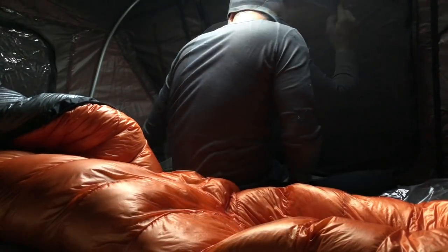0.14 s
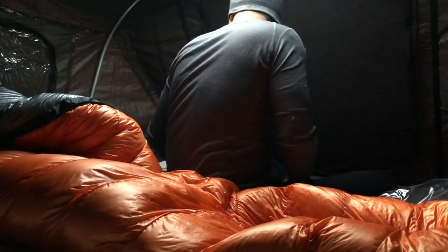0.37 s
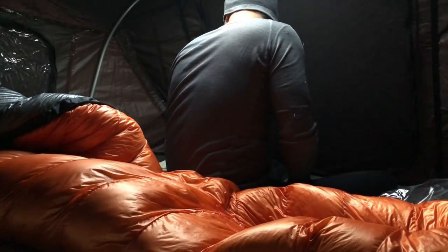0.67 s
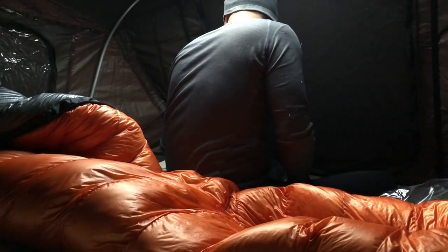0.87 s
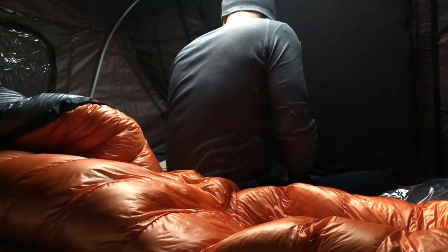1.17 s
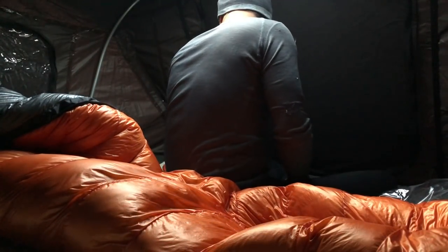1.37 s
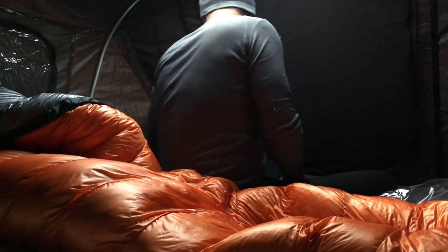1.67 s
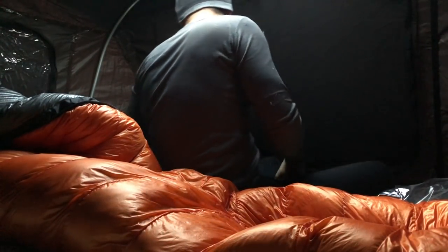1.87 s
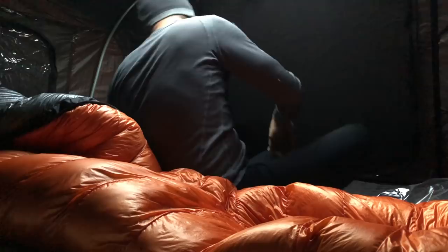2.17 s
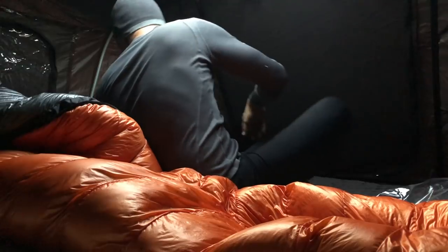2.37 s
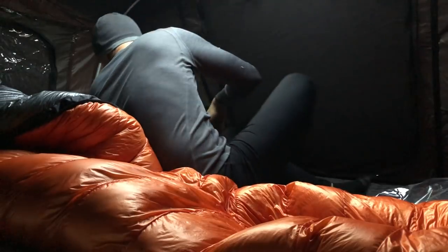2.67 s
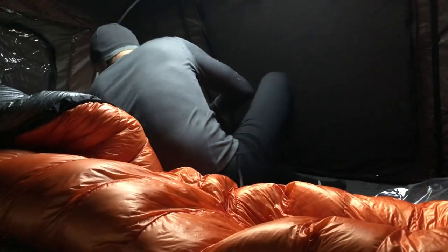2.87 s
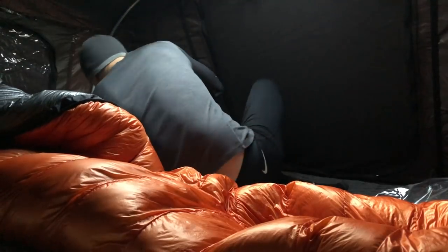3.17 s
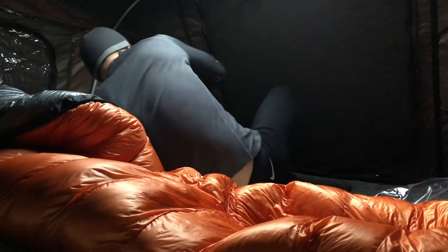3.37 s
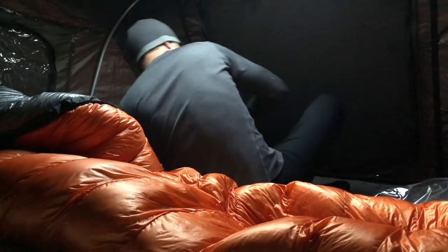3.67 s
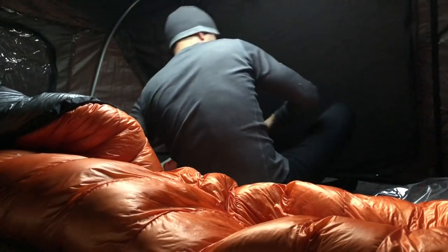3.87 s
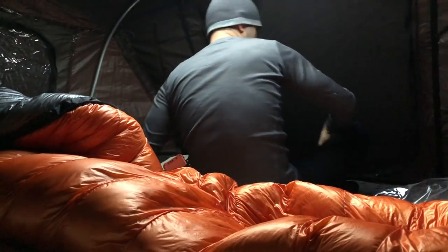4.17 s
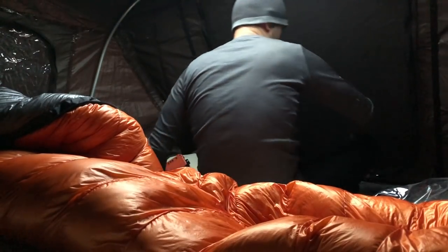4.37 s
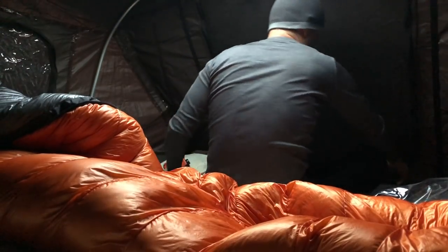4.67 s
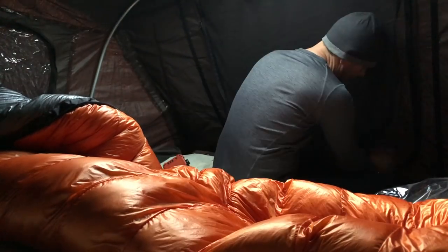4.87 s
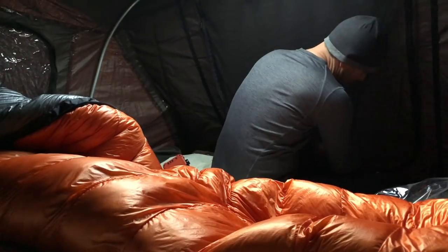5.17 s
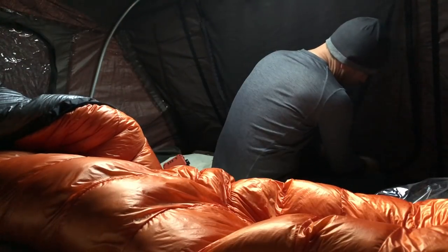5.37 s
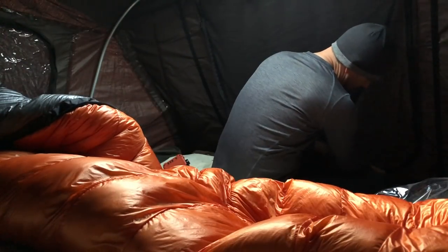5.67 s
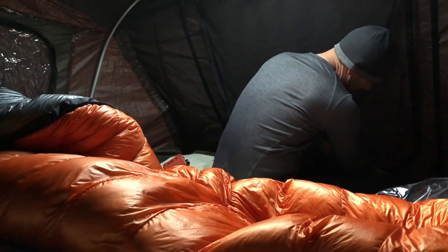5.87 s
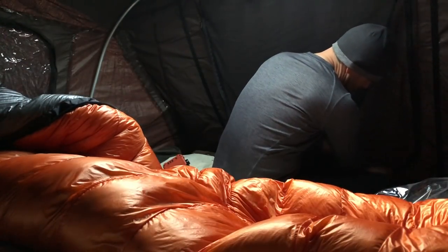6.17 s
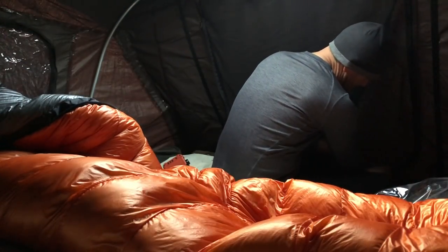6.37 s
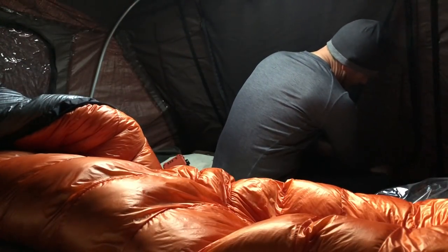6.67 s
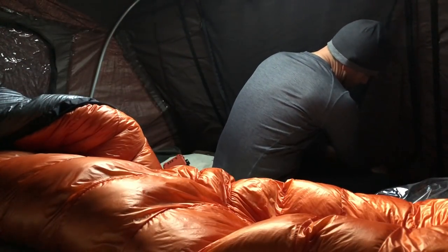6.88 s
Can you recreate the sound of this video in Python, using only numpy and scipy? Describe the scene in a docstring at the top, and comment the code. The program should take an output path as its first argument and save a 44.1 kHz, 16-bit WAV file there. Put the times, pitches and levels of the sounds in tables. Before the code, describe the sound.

In a small, nearly echo-free fabric tent, a low, gently uneven outdoor rumble runs throughout. From 0 to 0.35 s a zip is jerked in very short bursts, its teeth fusing into a buzzy whine, with cloth swishes, sharp clicks and soft low thumps. Sleeve brushes continue, and a weaker zip stroke rises in pitch at 0.8-0.9 s. Light rustles fade by 1.6 s. From 1.8 s a man turns on nylon bedding: swishing builds, strongest around 2.4-3.6 s, with dull weight thuds and short rasping drags at 3.1-3.7 s. It eases near 4 s, then softly resumes from 4.3 s. Crisp, airy brushes run from 4.8 to 5.4 s. A click and thump land at 5.75 s. From 6.1 to 7 s, metal pulls tick, knock and jingle in quick fumbling clusters, brightest near 6.45 and 6.86 s, over small padded bumps.

```python
"""Inside a small fabric tent a man runs a zip in two quick strokes: teeth tick so fast that they whine.
He then shifts about on nylon bedding, where filtered noise with tiny snaps makes the cloth swish and rasp.
His weight thumps the padded floor as short, low swings.
At last he fumbles with metal zip pulls, which click as noise bursts and jingle as fading sines.
A low outdoor rumble of shaped noise comes through the walls all along."""
import sys
import numpy as np
from scipy import signal
from scipy.fft import rfft, irfft
from scipy.io import wavfile
from scipy.ndimage import uniform_filter1d

SR = 44100
rng = np.random.default_rng(int(sys.argv[2]) if len(sys.argv) > 2 else 0)


def to_wav(sig):
    """Store sig (one row per channel, or 1-D mono) as 16-bit WAV at the path in sys.argv[1].

    Samples outside -1..1 are clipped; the rate is SR.
    """
    pcm = np.clip(np.atleast_2d(sig), -1, 1) * 32767
    pcm = np.round(pcm).astype(np.int16)
    wavfile.write(sys.argv[1], SR, pcm.T)  # frames by channels


N = 310464
T = np.arange(N) / SR
EDGE_HZ = 15900  # upper edge of the sound

# hiss of sliding nylon, also the plain tick of a contact: (frequency [Hz], density [dB per Hz])
SWISH_SPECTRUM = [(400, -29), (1500, -4), (2900, -0.5), (4000, 2), (6500, -0.5), (8500, -2.5), (11000, -6),
                  (16000, -9)]
# airy top of a light touch, also the bright part of a contact: (frequency [Hz], density [dB per Hz])
SHEEN_SPECTRUM = [(2000, -47), (6500, -5), (9000, -6.5), (12000, -4), (16000, -3.5)]


def amp(db):
    """Turns decibels into gain."""
    return 10 ** (np.asarray(db) / 20)


def unit(x):
    """Scales to an rms of 1."""
    return x / np.sqrt(np.mean(x ** 2) + 1e-20)


def add(mix, s, sound):
    """Mixes a sound in at a time in seconds."""
    part = mix[max(round(s * SR), 0):][:len(sound)]
    part += sound[:len(part)]


def curves(rows):
    """Joins the rows of a table by straight lines over time, one curve a column."""
    s, *columns = np.transpose(sorted(map(tuple, rows)))
    return [np.interp(T, s, c) for c in columns]


def colour(x, spectrum):
    """Filters a signal by a spectrum, at an rms of 1."""
    hz, db = np.transpose(spectrum)
    f = np.fft.rfftfreq(len(x), 1 / SR)
    gain = amp(np.interp(np.log(f + 1), np.log(hz), db))
    return unit(irfft(rfft(x) * gain, len(x)))


def noise(spectrum):
    """Steady noise of a given spectrum, at an rms of 1."""
    return colour(rng.standard_normal(N), spectrum)


def wander(hz):
    """Slow random drift of rms 1, dying away above hz."""
    f = np.fft.rfftfreq(N, 1 / SR)
    return unit(irfft(rfft(rng.standard_normal(N)) / (1 + (f / hz) ** 4), N))


def resonate(x, hz, width):
    """A resonance of gain 1 whose pitch may follow a curve."""
    turn = np.exp(2j * np.pi * np.cumsum(hz * np.ones(len(x))) / SR)
    r = np.exp(-np.pi * width / SR)
    # shift the pitch down to zero, smooth, and shift it back up
    smooth = signal.lfilter([1 - r], [1, -r], x / turn + 1e-18)
    return 2 * (turn * smooth).real


def resonate_twice(x, hz, width):
    """Two resonances in a row, the second twice as wide, for steeper sides."""
    return resonate(resonate(x, hz, width), hz, 2 * width)


def body(x, modes):
    """What a body with these resonances makes of a drive."""
    return sum(amp(db) * resonate_twice(x, hz, width) for hz, width, db in modes)


def stroke(length, from_hz, to_hz, grip_s, stop_s):
    """A pull grips, holds and stops while its pitch glides evenly: (envelope, Hz)."""
    t = np.arange(0, length, 1 / SR)
    envelope = np.clip(np.minimum(t / grip_s, (length - t) / stop_s), 0, 1)
    return envelope, from_hz + (to_hz - from_hz) * t / length


def zipper(jitter=0.021, flutter_db=2.0, direct_db=-23, scrape_from=0.77):
    """The slider snaps one tooth after another; at speed the ticks fuse into a whine."""
    # resonances of zip tape and taut door panel: (frequency [Hz], first-pass width [Hz], level [dB])
    panel_modes = [(600, 190, 8), (918, 210, -1), (1336, 120, -11), (1770, 620, -2), (2450, 110, -18),
                   (2590, 220, -8), (3200, 320, -14), (6100, 670, -21)]
    # the slider sticks and runs, one row a run: (start [s], length [s], teeth at the start [per s],
    # teeth at the end [per s], level [dB], roughness [0-1])
    runs = [(.002, 0.029, 1400, 1800, -51, 0.45), (0.024, 0.043, 2004, 2040, -34.5, 0.2),
            (0.058, .036, 2150, 2460, -47.5, 0.3), (0.121, .018, 2600, 2830, -41, 0),
            (.16, 0.044, 2600, 2410, -51, 0.33), (0.245, .095, 1600, 1340, -53, .85),
            (0.797, .065, 585, 942, -43, 0.26), (0.867, 0.032, 1340, 1395, -49, 0.24)]
    grip_s, stop_s = 0.0058, 0.0068
    speed_db_per_octave = 9  # a run is louder the faster it goes
    out = np.zeros(N)
    unsteady, flutter = 1 + jitter * wander(300), flutter_db * wander(160)
    for s, length, from_hz, to_hz, db, rough in runs:
        envelope, hz = stroke(length, from_hz, to_hz, grip_s, stop_s)
        now = round(s * SR) + np.arange(len(hz))
        rate = hz * unsteady[now]
        turns = np.cumsum(rate) / SR
        ticks = sum(np.cos(2 * np.pi * k * turns) * (k * rate < EDGE_HZ) / np.sqrt(k)
                    for k in range(1, 13))
        # rough runs scrape: noise that swells once a tooth
        scrape = (1 + np.cos(2 * np.pi * turns)) * rng.standard_normal(N)[now]
        cutoff_hz = min(scrape_from * hz.mean(), EDGE_HZ)
        highpass = signal.butter(2, cutoff_hz, "highpass", fs=SR, output="sos")
        scrape = signal.sosfilt(highpass, scrape)
        drive = (1 - rough) * unit(ticks) + 2 * rough * unit(scrape)
        whine = body(drive, panel_modes) + amp(direct_db) * drive
        # level out the loudness as the pitch crosses resonances
        whine = whine / np.sqrt(uniform_filter1d(whine ** 2, size=400) + 1e-9)
        speed_db = speed_db_per_octave * np.log2(hz / hz.mean())
        add(out, s, whine * envelope * amp(db + speed_db + flutter[now]))
    return out


def clicks(tick_db=-10, knock_db=-9, bright_db=-10, ping_db=-13, ping_width_hz=260,
           tail_db=-19, tail_t60=0.14):
    """Each contact is a brief chatter of metal with a ping of its own; it also knocks the frame."""
    # slider and pulls knocking: (time [s], level [dB], frame knock [dB re level], brightness [dB])
    contacts = [(0.2184, -22.5, -19, -22.5), (0.2846, -27, 7, -10), (0.3131, -26, -8, -14),
                (0.6013, -40, -4, -11), (2.087, -40, 1, 2.5), (4.004, -44, -20, 6), (5.194, -47, -13, -11),
                (5.7658, -30, -4, -19), (5.7711, -36, 7.5, -9), (6.1358, -50, 0, 7),
                (6.2008, -37.5, -18, 10.5), (6.3364, -35, 0, -4.5), (6.3428, -38, 5.5, 0),
                (6.362, -43, 5, -2), (6.4214, -40.5, 9, -6), (6.431, -45, 9, -9), (6.445, -39, -5, 10.5),
                (6.4536, -28.5, -6, 5.5), (6.519, -37, 0, 13.5), (6.5318, -44, 8, 2.5),
                (6.73, -48, -7, 8.5), (6.742, -38, 6.5, -6), (6.8336, -37.5, -5, 8.5),
                (6.863, -42, -8, 14.5), (6.887, -39, -2, 5), (6.9574, -46.5, 8, -14)]
    # the door frame, knocked by the slider: (frequency [Hz], first-pass width [Hz], level [dB])
    frame_modes = [(1033, 200, -5), (1453, 18, 0), (1870, 70, -7.5), (2395, 110, -6), (3270, 280, -14)]
    # rise, decay and pitch of a contact of 0 dB brightness
    neutral_attack_s, neutral_t60_s, neutral_ping_hz = 0.0018, 0.022, 7450
    ping_db_per_octave = 14.5  # brighter contacts ping higher
    ring_db_per_doubling = 19  # and ring longer; dull snaps die at once
    out, t = np.zeros(N), T[:SR // 6]
    tick, bright = noise(SWISH_SPECTRUM), noise(SHEEN_SPECTRUM)
    knock = unit(body(rng.standard_normal(N), frame_modes))
    for s, db, knock_rel, bright_rel in contacts:
        part = rng.integers(N - len(t)) + np.arange(len(t))
        ping_hz = min(neutral_ping_hz * 2 ** (bright_rel / ping_db_per_octave), EDGE_HZ)
        age = t / 2 ** (bright_rel / ring_db_per_doubling)
        decay = amp(-60 * age / neutral_t60_s) + amp(tail_db - 60 * t / tail_t60)
        blow = np.minimum(age / neutral_attack_s, 1) * decay
        ping = unit(resonate(rng.standard_normal(len(t)), ping_hz, ping_width_hz))
        chatter = (amp(tick_db) * tick[part]
                   + amp(bright_db + bright_rel) * bright[part]
                   + amp(knock_db + knock_rel) * knock[part]
                   + amp(ping_db) * np.hypot(1, amp(bright_rel)) * ping)
        add(out, s, amp(db) * blow * chatter)
    return out


def fidgets(swish, from_s=6.33, per_s=60, level_db=-74.5, spread_db=3.0, t60=0.041):
    """Tiny ticks of teeth and fingernails while he fumbles, stronger when the cloth swishes more."""
    sizes = swish * amp(spread_db * np.minimum(rng.exponential(1, N), 3))
    hits = sizes * (rng.random(N) < per_s / SR) * (T > from_s)
    decay = amp(-60 * T[:SR // 30] / t60)
    envelope = signal.fftconvolve(hits, decay)[:N]
    return amp(level_db) * unit(envelope * (noise(SWISH_SPECTRUM) + noise(SHEEN_SPECTRUM)))


def jingles(centre_hz=8000, damped_t60=0.037):
    """A pull swings free, ringing in its modes until a finger damps it; tilt favours the high ones."""
    # one row a swing: (time [s], level [dB], tilt [dB per octave], free for [s])
    swings = [(6.35, -66, 14, .03), (6.454, -60, 15, .025), (6.521, -57, 15, 0.029), (6.678, -61, 4, .07),
              (6.835, -63, 15, .025), (6.863, -42.5, 5, 0.028)]
    # modes of the metal pull: (frequency [Hz], level [dB], undamped t60 [s])
    pull_modes = [(4695, 3, 0.16), (6900, -12, 0.091), (7850, 0, .09), (8200, -13, .08), (10670, -1, 0.057),
                  (11250, -10, .18), (11880, -17, 0.057), (14880, -10, .14)]
    out, t = np.zeros(N), T[:SR // 3]
    for s, level, tilt, free_s in swings:
        finger_db = -60 * np.maximum(t - free_s, 0) / damped_t60
        for hz, db, t60 in pull_modes:
            tilt_db = tilt * np.log2(hz / centre_hz)
            fade = amp(level + db + tilt_db - 60 * t / t60 + finger_db)
            add(out, s, fade * np.sin(2 * np.pi * (hz * t + rng.random())))
    return out


def tent(x, wet_db, t60):
    """Close fabric walls give a short scatter of reflections."""
    t = T[:SR // 8]
    scatter = rng.standard_normal(len(t)) * (rng.random(len(t)) < 2000 / SR)  # 2000 per second
    taps = scatter * (t > .002) * amp(-60 * t / t60)
    return x + amp(wet_db) * signal.fftconvolve(x, taps / np.linalg.norm(taps))[:N]


def arch(peak_s, rise_s, fall_s):
    """A movement that gathers speed and slows again: (when it sounds, its level in dB then)."""
    drop_db, curve = 10, 1.96  # this far down after its rise or fall time
    away = np.maximum((peak_s - T) / rise_s, (T - peak_s) / fall_s)
    near = away < 4
    return near, -drop_db * away[near] ** curve


def rubbing():
    """How hard the nylon is rubbed, as gains of swish, body and sheen: turn and brushes together."""
    # one long rustle as he turns round on the bedding:
    # (time [s], swish [dB], body of the cloth [dB re swish], sheen [dB re swish])
    turn = [(1.78, -76, 4, 3), (1.81, -65.5, 0, 5), (1.89, -61, -0.5, 7), (2.07, -62.5, 2, -0.5),
            (2.11, -56, -0.5, 2), (2.22, -52, 0.5, -1), (2.31, -60.5, 8, -3), (2.43, -48, -1, 1.5),
            (2.57, -42, -6, -1.5), (2.78, -51, -2, 4.5), (2.83, -44.5, -2, 4), (2.88, -52.5, 4, 2),
            (2.93, -43, -9, -5), (3.01, -54.5, 0.5, -9), (3.2, -51.5, 2.5, 2.5), (3.35, -51.5, 0, 5),
            (3.49, -44.5, 2.5, -7), (3.58, -50.5, 1, -7), (3.6, -57.5, 0, 0), (3.67, -53, 0.5, 0),
            (3.77, -57.5, 2, -2), (3.89, -50, -1.5, -1.5), (4.23, -68.5, 2.5, 1), (4.33, -59, -3.5, -4),
            (4.52, -59.5, 0.5, -1), (4.58, -55, -1.5, -4), (4.68, -64, -4, -3), (4.74, -62.5, 0, 0)]
    # single brushes of a sleeve or hand over nylon: (loudest at [s], rise [s], fall [s],
    # swish [dB], body [dB re swish], sheen [dB re swish])
    brushes = [(.07, 0.16, 0.12, -46.5, -0.5, -0.5), (.27, 0.15, 0.12, -48.5, -1.5, -1),
               (.488, 0.088, 0.025, -58, 1, 1), (.61, 0.073, .05, -66.5, 5.5, 2.5),
               (.735, 0.059, 0.14, -50, 0, -2.5), (.87, 0.068, .075, -49, -4.5, -2),
               (.955, 0.022, .016, -61.5, 5.5, 0), (1.09, 0.11, .16, -77.5, 12.5, -12),
               (1.35, 0.052, 0.074, -57, -1, -4), (1.548, 0.033, 0.029, -59, -5, -2),
               (4.77, .018, 0.035, -57.5, 1.5, 4), (4.872, 0.045, 0.087, -49.5, -5.5, -4),
               (5.01, 0.026, 0.053, -50.5, -8.5, 0.5), (5.105, 0.049, 0.038, -45, -20, 3),
               (5.198, 0.012, .03, -54.5, -13, 1.5), (5.28, 0.041, 0.033, -54.5, -5.5, 3),
               (5.326, .035, 0.027, -45.5, -15.5, -0.5), (5.41, 0.082, 0.087, -64, 3.5, 5.5),
               (5.67, 0.097, 0.14, -53.5, -7.5, -1.5), (5.8, .06, 0.059, -55, -12, -1),
               (6.0, .12, 0.092, -58, -3, 1), (6.1, 0.017, 0.016, -57, -8, -5),
               (6.25, 0.15, .08, -64, -7, -1), (6.355, 0.015, 0.015, -54.5, -7, -2),
               (6.44, 0.043, 0.043, -61.5, -14, 5.5), (6.65, 0.095, 0.086, -62, -11, -7),
               (6.88, 0.059, 0.042, -61.5, -6, 4)]
    # the bedding never lies quite still: (swish [dB], body [dB], sheen [dB])
    resting_db = (-72.5, -73, -89)
    turn_fade_s = 0.028
    swish, pressed, sheen = curves(turn)
    inside_s = np.minimum(T - turn[0][0], turn[-1][0] - T)
    turning = np.clip(1 + inside_s / turn_fade_s, 0, 1)
    turn_gains = turning * amp([swish, swish + pressed, swish + sheen])
    power = amp(resting_db)[:, None] ** 2 + turn_gains ** 2
    for s, rise, fall, db, body_rel, sheen_rel in brushes:
        near, shape_db = arch(s, rise, fall)
        power[:, near] += np.outer(amp([db, db + body_rel, db + sheen_rel]), amp(shape_db)) ** 2
    return np.sqrt(power)


def fibres(snags_per_s=600, snag_db=-8, spread_db=3):
    """Countless threads slip past each other; a few snag and let go with a tiny snap."""
    sizes = amp(spread_db * np.minimum(rng.exponential(1, N), 4)) * rng.choice([-1, 1], N)
    snags = sizes * (rng.random(N) < snags_per_s / SR)
    return rng.standard_normal(N) + amp(snag_db) * unit(snags)


def cloth(rub, flutter_db=0.72, body_flutter_db=1.03):
    """Sliding nylon hisses; pressed cloth adds body, a light fast touch adds sheen."""
    # low rustle of pressed cloth: (frequency [Hz], density [dB per Hz])
    body_spectrum = [(18, -22), (45, 3), (100, 6.5), (300, -2.5), (500, 1.5), (800, -4.5), (1150, -0.5),
                     (1450, 4), (1900, -1.5), (2500, -0.5), (3500, -6.5), (7000, -18)]
    swish, pressed, sheen = rub
    pressed_threads = colour(fibres(snags_per_s=340, snag_db=-15.5), body_spectrum)
    low = pressed * amp(body_flutter_db * wander(60)) * pressed_threads
    middle = swish * colour(fibres(), SWISH_SPECTRUM)
    high = sheen * colour(fibres(), SHEEN_SPECTRUM)
    return amp(flutter_db * wander(32)) * (low + middle + high)


def folds(x, patchy_db=1.5, size_frames=14, size_bins=5):
    """Shifting folds of cloth favour some frequencies for a moment and shade others."""
    z = signal.stft(x, nperseg=512)[2]
    field = uniform_filter1d(rng.standard_normal(z.shape), size_bins, axis=0)
    field = uniform_filter1d(field, size_frames, axis=1)
    gain = amp(patchy_db * unit(field))
    return signal.istft(z * unit(gain), nperseg=512)[1][:N]


def drags(width_share=0.4, level_db=-2):
    """The weave rasps under his weight, its pitch following the speed of the shove."""
    # cloth dragged hard over the mattress, one row a shove: (start [s], length [s],
    # centre at the start [Hz], centre at the end [Hz], level [dB before level_db])
    shoves = [(3.134, 0.068, 270, 343, -44), (3.218, 0.087, 1170, 1200, -51),
              (3.458, 0.134, 1380, 440, -44.5), (3.655, 0.048, 430, 560, -55)]
    grip_s, stop_s = 0.024, 0.017
    out, weave = np.zeros(N), fibres(snag_db=-9)
    for s, length, from_hz, to_hz, db in shoves:
        envelope, centre = stroke(length, from_hz, to_hz, grip_s, stop_s)
        width = width_share * centre.mean()
        threads = weave[round(s * SR):][:len(centre)]
        rasp = unit(resonate_twice(threads, centre, width))
        add(out, s, amp(db + level_db) * envelope * rasp)
    return out


def thumps(level_db=-3.5, thud_db=-11, thud_stretch=1.6, thud_width_hz=110):
    """A soft push swings the floor for a few cycles, over a dull thud of the padding."""
    # weight landing on the padded floor: (time [s], level [dB before level_db], pitch [Hz])
    landings = [(0.009, -34.5, 169), (0.288, -32, 128), (0.323, -32.5, 105), (0.339, -40, 62),
                (0.352, -39, 114), (0.405, -33.5, 116), (0.541, -41, 90), (0.681, -40, 95),
                (1.529, -37.5, 100.5), (2.438, -37, 217), (2.638, -43.5, 55), (2.85, -37, 113),
                (2.886, -44, 57.7), (3.151, -31.5, 140), (3.178, -27.5, 243), (3.459, -32, 126),
                (3.655, -35, 181), (3.698, -40, 95), (4.39, -36.5, 63), (4.461, -37, 69.5),
                (4.762, -43, 67), (4.795, -41, 166), (4.827, -40, 156), (5.297, -38, 149),
                (5.734, -36.5, 116), (5.765, -30.5, 142), (6.095, -36.5, 152), (6.127, -33, 171),
                (6.145, -40.5, 96), (6.339, -31, 212), (6.354, -31, 165), (6.421, -28, 216),
                (6.443, -32, 165), (6.455, -39.5, 96), (6.527, -32.5, 170), (6.683, -37, 137),
                (6.756, -37.5, 104), (6.885, -36, 110), (6.904, -36, 150)]
    rise_cycles = 1.12  # the floor reaches its widest swing after this many cycles
    out, t = np.zeros(N), T[:SR // 4]
    for s, db, hz in landings:
        u = t * hz / rise_cycles
        swing = u ** 2 * np.exp(2 * (1 - u)) * np.sin(2 * np.pi * hz * t)
        thud = unit(resonate_twice(rng.standard_normal(len(t)), hz, thud_width_hz))
        padding = u / thud_stretch * np.exp(1 - u / thud_stretch) * thud
        add(out, s, amp(db + level_db) * (swing + amp(thud_db) * padding))
    return out


def outdoors(level_db=-54.5, swell_db=0.95):
    """A low, gently lumpy rumble with a faint hiss."""
    # rumble through the walls: (frequency [Hz], density [dB per Hz])
    rumble_spectrum = [(20, -47), (35, -14), (55, -6.5), (110, 1), (180, 0), (270, -9), (450, -16.5),
                       (900, -18.5), (1400, -23.5), (2200, -32.5), (5000, -38), (15500, -35)]
    return amp(level_db + swell_db * wander(17)) * noise(rumble_spectrum)


def scene():
    """Zip hardware in the small tent, the bedding and the rumble outside, alike in both ears."""
    rub = rubbing()
    hardware = zipper() + clicks() + fidgets(rub[0]) + jingles()
    bedding = folds(cloth(rub)) + drags() + thumps()
    mono = tent(hardware, wet_db=-6.5, t60=0.017) + bedding + outdoors()
    return np.array([mono, mono])


def record(dry):
    """The microphone's bass roll-off, then the band limit."""
    highpass = signal.butter(2, 35, "highpass", fs=SR, output="sos")
    lean = signal.sosfilt(highpass, dry)
    lowpass = signal.firwin(511, EDGE_HZ, window=("kaiser", 9), fs=SR)
    return signal.oaconvolve(lean, lowpass[None], "same")


dry = scene()
out = record(dry)
to_wav(out)
```